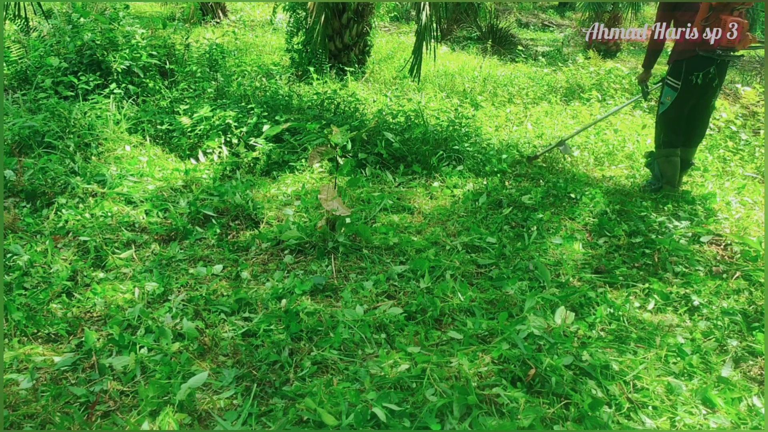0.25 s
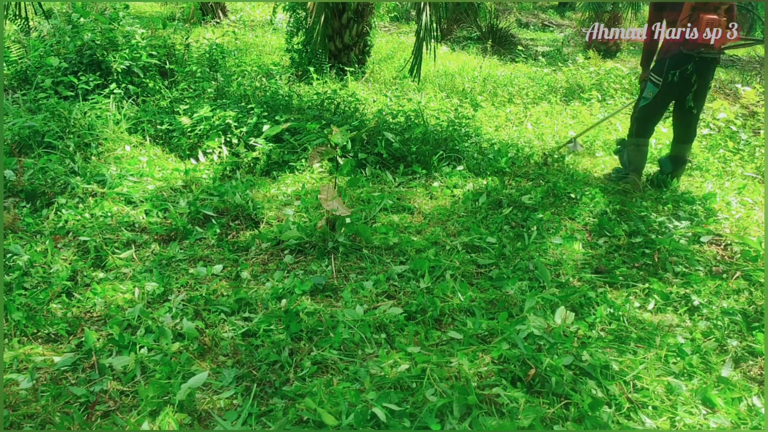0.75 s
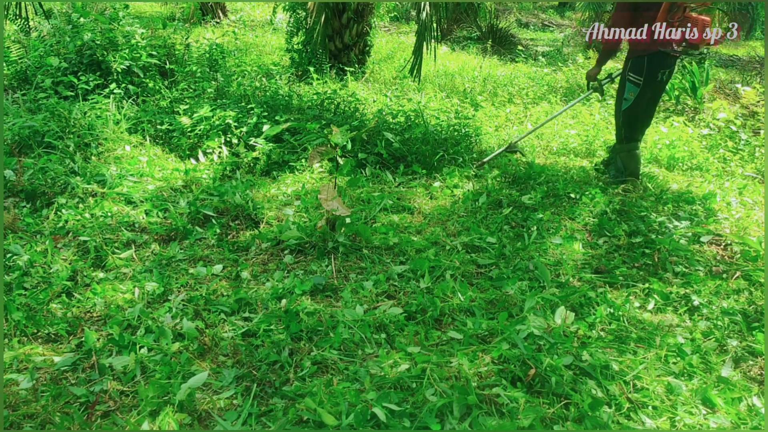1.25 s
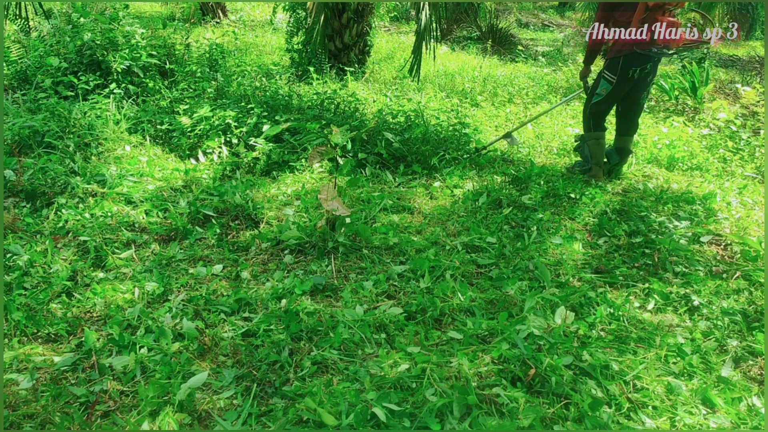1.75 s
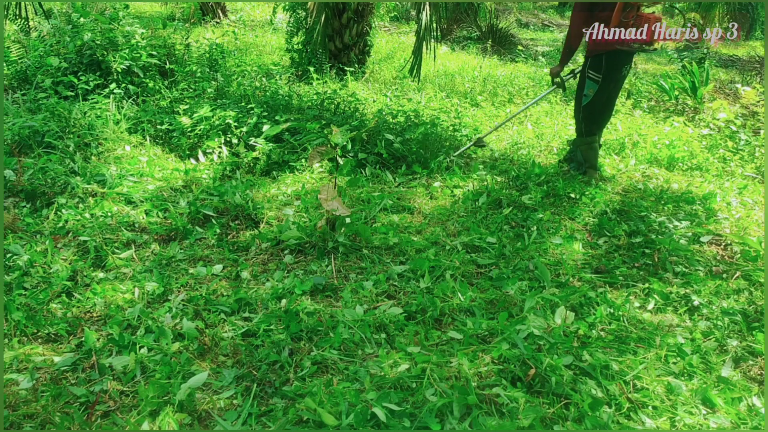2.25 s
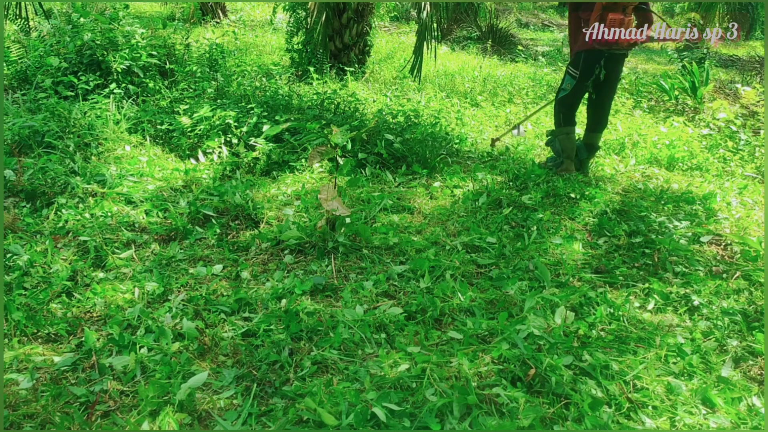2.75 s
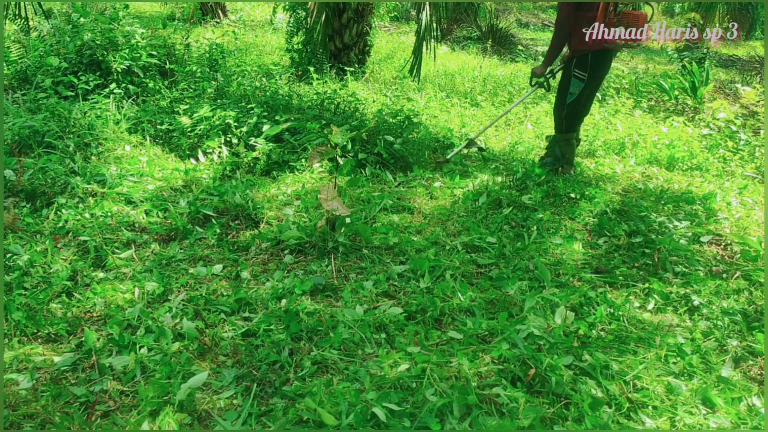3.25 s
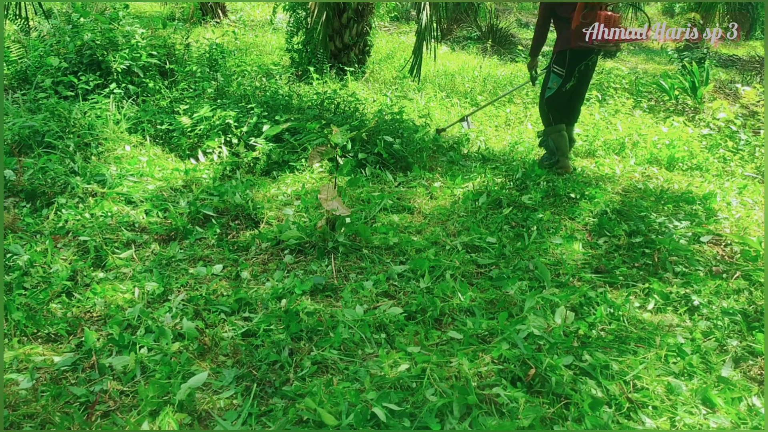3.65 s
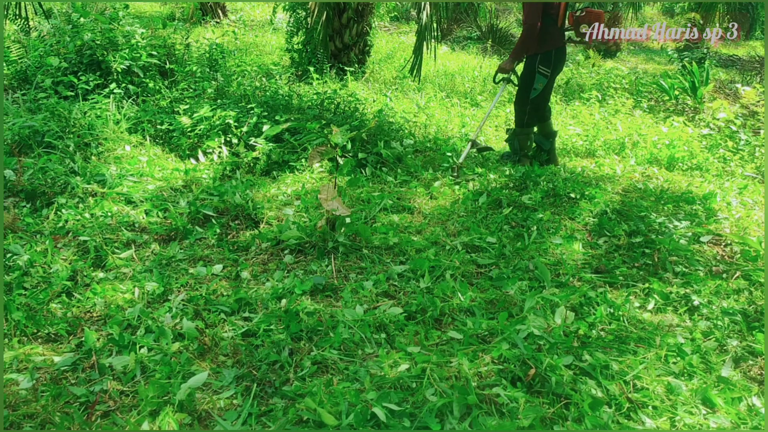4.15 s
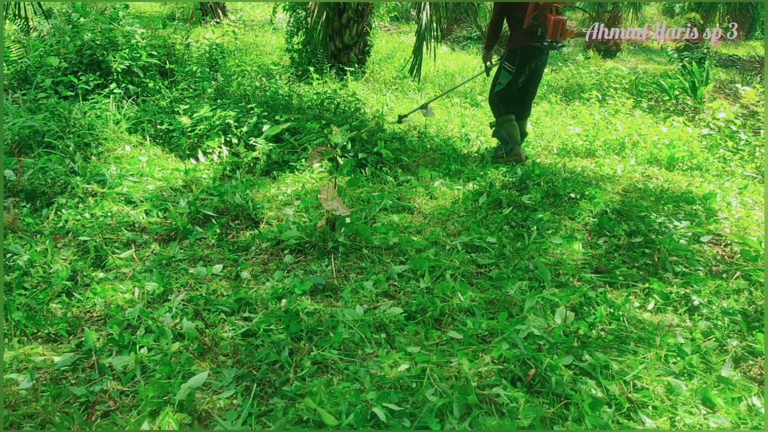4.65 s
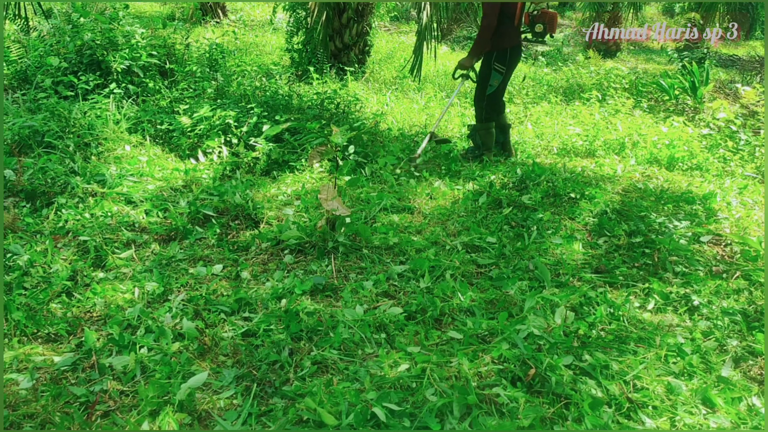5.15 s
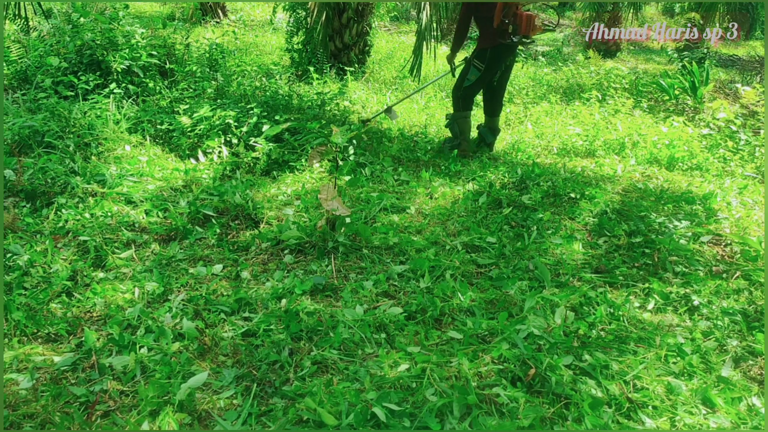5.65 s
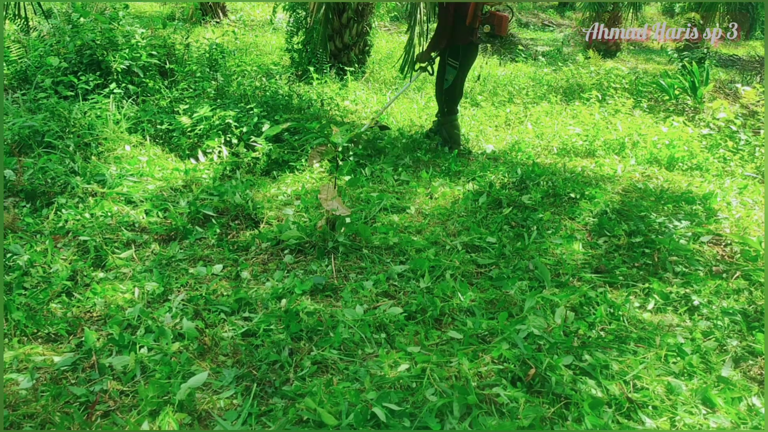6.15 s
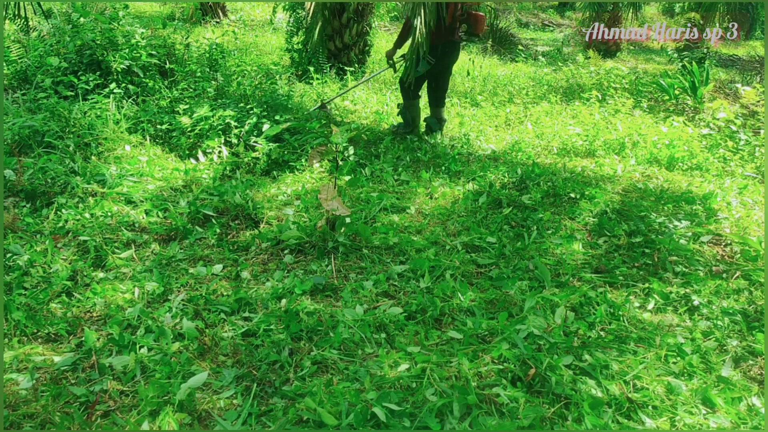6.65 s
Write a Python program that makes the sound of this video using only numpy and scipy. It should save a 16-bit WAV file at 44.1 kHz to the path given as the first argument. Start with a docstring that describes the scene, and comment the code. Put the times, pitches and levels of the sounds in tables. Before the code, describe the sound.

A small petrol brush cutter runs continuously outdoors, a rough, fluttering bark with a hollow boom and metallic casing rattle. Its speed wavers and stumbles under load. About twice a second the blade sweeps into weeds with a bright hissing shred, rustle and occasional sharp snaps. The microphone stands several metres away under trees, in stereo, with faint trunk echoes and very quiet air as the machine slowly moves off.

```python
"""A small petrol brush cutter is swung through weeds under trees, slowly moving away. The two-stroke fires
every other turn: each cycle gives a firing click and a weaker click from the turn without firing; resonances
turn the clicks into boom, bark and puff. Knocks shake noise and rings out of the casing, and the ground and
trees send echoes. The blade shreds stems in bursts of hissing noise with brief stem rings; sharp ticks are
snaps and engine taps. Very quiet low noise stands for the air."""
import sys
import numpy as np
from scipy import signal
from scipy.io import wavfile
from scipy.ndimage import uniform_filter1d

SR = 44100
rng = np.random.default_rng(int(sys.argv[2]) if len(sys.argv) > 2 else 0)


def store_wav(level_fs):
    """Save 16-bit WAV to argv[1]."""
    pcm = np.round(np.clip(np.atleast_2d(level_fs), -1, 1) * 32767)
    wavfile.write(sys.argv[1], SR, pcm.T.astype(np.int16))


N = 303849

# engine speed: (time [s], speed [cycles per s])
ENGINE_SPEED = [(0.0, 44.19), (0.09, 47.78), (0.24, 46.84), (0.57, 40.52), (0.68, 48.1), (0.94, 46.14),
                (1.03, 41.91), (1.16, 43.2), (1.33, 49.94), (1.42, 40.5), (1.51, 46.17), (1.75, 51.78),
                (1.88, 47.2), (1.99, 40.71), (2.21, 49.88), (2.3, 38.45), (2.41, 42.08), (2.54, 39.96),
                (2.73, 51.66), (2.84, 50.05), (2.93, 53.55), (3.02, 51.0), (3.15, 40.82), (3.28, 47.1),
                (3.56, 48.2), (3.72, 55.03), (3.96, 44.09), (4.12, 42.6), (4.27, 45.6), (4.38, 42.8),
                (4.46, 43.33), (4.57, 48.82), (4.72, 54.24), (4.8, 51.06), (5.01, 47.06), (5.14, 51.51),
                (5.47, 45.59), (5.56, 48.28), (5.82, 46.43), (5.91, 41.31), (6.16, 42.56), (6.25, 48.12),
                (6.45, 45.19), (6.54, 50.42), (6.65, 52.02), (6.89, 48.1)]
# exhaust strength: (time [s], boom level [dB], bark level [dB])
EXHAUST_LEVELS = [(0.0, -39.5, -43), (0.11, -45, -40), (0.21, -40.5, -40.5), (0.48, -45, -47),
                  (0.77, -38, -39), (1.19, -48, -48), (1.23, -42, -43.5), (1.46, -41, -47),
                  (1.63, -39, -40), (1.92, -41.5, -46.5), (2.03, -51, -49), (2.15, -39.5, -40),
                  (2.32, -47, -49), (2.59, -42, -45.5), (2.76, -38, -41.5), (3.22, -53.5, -47),
                  (3.34, -43, -41), (3.68, -40.5, -43.5), (4.01, -56.5, -48.5), (4.18, -70.5, -46.5),
                  (4.32, -43, -49.5), (4.55, -41, -42.5), (5.05, -48, -43.5), (5.2, -70.5, -47),
                  (5.33, -43.5, -41.5), (5.39, -60, -47), (5.45, -43.5, -44), (5.78, -44.5, -41),
                  (6.06, -69, -48), (6.1, -53.5, -44), (6.37, -44, -45.5), (6.64, -48.5, -39.5),
                  (6.68, -67, -45.5), (6.77, -44, -40), (6.85, -64, -40.5), (6.89, -38.5, -42)]
# walking away: (time [s], ground echo delay [ms], left lag [samples], casing level [dB], fins level [dB])
WALKING_AWAY = [(0, 1.3, -5.5, -51.5, -52.5), (1, 1.31, -6, -48, -48.5), (1.7, 1.27, -5.5, -50, -52.5),
                (2.5, 1.26, -4, -47.5, -48.5), (3.4, 1.19, -3.5, -49.5, -51.5),
                (4.2, 1.233, -2.5, -49.5, -49), (4.6, 1.13, 3, -49.5, -55.5), (5.2, 1.145, 2, -50, -53.5),
                (6.15, 1.075, 3, -50, -55.5), (6.89, 0.91, 1.5, -51.5, -59)]


def amp(db):
    """Turn dB into a gain."""
    return 10 ** (np.asarray(db) / 20)


def rms_one(x, size=0):
    """Bring the level to 1, overall or along a moving window smoothed twice over `size` samples."""
    if size:
        power = uniform_filter1d(uniform_filter1d(x ** 2, size), size)
    else:
        power = np.mean(x ** 2)
    return x / np.sqrt(power + 1e-20)


def in_time(rows):
    """Draw straight lines between a table's rows: each column gets one value a sample."""
    s, *columns = np.transpose(rows)
    return [np.interp(np.arange(N) / SR, s, c) for c in columns]


def resonate(x, modes):
    """Let resonances ring side by side, with alternating signs; a narrow width rings longer."""
    out = 0
    for k, (hz, width_hz, db) in enumerate(modes):
        r = np.exp(-np.pi * width_hz / SR)
        a = [1, -2 * r * np.cos(2 * np.pi * hz / SR), r * r]
        b = [(1 - r * r) / 2, 0, (r * r - 1) / 2]
        out = out + (-1) ** k * amp(db) * signal.lfilter(b, a, x + 1e-18)
    return out


def butter(x, order, hz, kind="low"):
    """Filter away what lies above (low), below (high) or outside (band) the given frequencies."""
    return signal.sosfilt(signal.butter(order, hz, kind, fs=SR, output="sos"), x)


def band(x, low_hz, high_hz):
    """Keep the sound between two frequencies, with gentle edges."""
    return butter(x, 2, [low_hz, high_hz], "band")


def delayed(x, samples):
    """Read a sound later by a lag that may move; a negative lag reads it earlier."""
    return np.interp(np.arange(N) - samples, np.arange(N), x)


def flicker(hz):
    """Random wandering no faster than about `hz`, of spread 1, unrelated left and right."""
    return rms_one(butter(rng.standard_normal((2, N)), 2, hz))


def cycles(size):
    """Count engine cycles up to each sample; each stumble is spread over `size` samples."""
    # uneven beats: (last firing before it [s], size: above 0 holds the beat back, below 0 hurries it)
    stumbles = [(0.355, 1), (0.411, 1), (0.467, -1), (0.552, -1), (0.803, .42), (0.938, .48), (1.008, 1.37),
                (1.165, 1.4), (1.328, 1), (1.495, 1), (2.078, 1), (2.257, -1), (2.319, -1), (2.552, -1),
                (3.254, 1), (3.306, 1), (3.964, 1), (4.016, 1), (4.759, .6), (5.048, .45), (5.073, .2),
                (5.273, 1.3), (5.418, 1), (5.968, 1), (6.049, 1), (6.151, 1), (6.726, 1)]
    late_cycles, early_cycles = .43, .45  # shift of the beat for a stumble of size 1
    late_after_s, early_after_s = .014, .003  # when the shift sets in
    inertia_s, first_cycle = .05, .28
    lost = np.zeros(N)
    for s, way in stumbles:
        after_s, shift = (late_after_s, late_cycles) if way > 0 else (early_after_s, early_cycles)
        lost[round((s + after_s) * SR):] += way * shift
    # the flywheel rounds off every change of speed
    span = round(inertia_s * SR)
    speed = uniform_filter1d(in_time(ENGINE_SPEED)[0], span, mode="nearest")
    speed = uniform_filter1d(speed, span, mode="nearest")
    return np.cumsum(speed) / SR - first_cycle - uniform_filter1d(lost, size)


def pulses(count, spread_db, jitter_ms, lead_ms):
    """One click as the count passes each whole cycle, a little scattered in strength and moment."""
    step = np.diff(count)
    at = np.flatnonzero((np.diff(np.floor(count)) > 0) & (step < .1))  # a jump forward does not click
    draw = rng.standard_normal((400, 2))[:len(at)]
    moved = at + (draw[:, 0] * jitter_ms - lead_ms) * SR / 1000
    clicks = np.zeros(N)
    clicks[np.clip(moved.astype(int), 0, N - 1)] = amp(draw[:, 1] * spread_db)
    return clicks


def gas_noise(exhaust, unfired):
    """Turbulent gas hisses after each valve opening and dies within a few tens of ms."""
    gust = signal.lfilter([1], [1, -np.exp(-1 / (.007 * SR))], exhaust + .8 * unfired)
    return gust * rng.standard_normal(N)


def boom_and_growl(exhaust, gas):
    """Exhaust pulses and a little gas noise ring low resonances: a boom, and a growl just above it."""
    # boom resonances: (frequency [Hz], width [Hz], level [dB])
    boom_modes = [(226, 66.8, 7.5), (293, 181, 2)]
    # growl resonance: (frequency [Hz], width [Hz], level [dB])
    growl_modes = [(342.3, 198, 0)]
    # growl, stronger when the pipe points this way: (time [s], level [dB])
    growl_db = [(0, -38.5), (.25, -42.5), (.36, -38), (.9, -45), (1.1, -39), (1.8, -43), (1.9, -40.5),
                (2.1, -43.5), (3.8, -44), (4.1, -55.5), (4.5, -41), (5.2, -67), (5.5, -44), (6.15, -61),
                (6.33, -37), (6.5, -42), (6.68, -54), (6.8, -44.5), (6.89, -54)]
    boom_lead_ms = 2.69  # the slow boom starts before the crack
    early = delayed(exhaust, -boom_lead_ms * SR / 1000)
    boom = resonate(resonate(early + .008 * gas, boom_modes), [(270, 300, 0)])
    growl = resonate(resonate(exhaust + 0.02 * gas, growl_modes), growl_modes)
    boom = amp(in_time(EXHAUST_LEVELS)[0]) * rms_one(boom, size=3000)
    return boom + amp(in_time(growl_db)[0]) * rms_one(growl)


def bark_and_puff(exhaust, unfired, gas):
    """The pipe rings and cracks at each firing, and the turn without firing puffs; their top edge comes apart."""
    # pipe ring, lower and upper mode: (frequency [Hz], width [Hz], level [dB])
    ring_modes = [(525, 98, 9), (701, 95, -1.5)]
    # crack resonances: (frequency [Hz], width [Hz], level [dB])
    crack_modes = [(685, 380, 0), (1045, 280, -1.5)]
    # resonances of the unfired turn's puff: (frequency [Hz], width [Hz], level [dB])
    puff_modes = [(857, 690, 0), (1026, 150, -9.5)]
    # puff of the unfired turn: (time [s], level [dB])
    puff_db = [(0.0, -54), (0.53, -44), (1.17, -49), (1.54, -45.5), (1.92, -48.5), (1.96, -53.5),
               (2.22, -46), (2.3, -51), (2.4, -47.5), (2.8, -43.5), (3.2, -50.5), (3.57, -48.5),
               (3.67, -42), (3.78, -51), (3.82, -44.5), (3.89, -51), (3.95, -46), (4.11, -51), (4.49, -46),
               (5.22, -48.5), (5.66, -48.5), (5.76, -45), (6.04, -50.5), (6.47, -48), (6.81, -49.5),
               (6.89, -49)]
    # top edge of the bark and puff mids: (time [s], level [dB])
    edge_db = [(0.0, -93), (0.15, -75), (0.31, -75), (0.34, -72), (0.96, -75), (1.0, -67), (1.25, -89.5),
               (1.34, -69), (1.44, -87), (1.92, -65), (2.09, -90), (2.24, -72), (2.28, -82), (2.76, -62.5),
               (2.88, -71), (3.07, -60), (3.18, -81.5), (3.61, -80), (3.65, -69), (3.93, -74), (3.97, -68),
               (4.18, -93), (4.22, -83), (4.45, -66), (4.51, -84), (4.57, -67), (4.89, -65), (5.14, -88),
               (5.31, -71), (5.74, -66), (6.12, -87), (6.33, -69), (6.83, -67), (6.89, -68)]
    ring_lead_ms = 1.51  # the ring starts before the crack
    brightens_db = 1.68  # upper ring mode, for each cycle a second above 45.5
    crack_db = -11  # crack against ring when boom and bark levels are equal
    return_ms, return_gain = 1.15, .5  # the crack comes back once from the pipe's end
    boom_db, bark_db = in_time(EXHAUST_LEVELS)
    # extra gas noise in the pipe when the boom dies away
    unburnt = .026 * np.clip((bark_db - boom_db) / 10, 0, 1)

    # the pipe rings when the valve opens
    opening = delayed(exhaust, -ring_lead_ms * SR / 1000) + (.01 + unburnt) * gas
    brightens = amp(brightens_db * (in_time(ENGINE_SPEED)[0] - 45.5))
    ring = rms_one(resonate(opening, ring_modes[:1]) - brightens * resonate(opening, ring_modes[1:]))
    # a charge that burnt adds a crack that grows with the boom
    blast = exhaust + return_gain * delayed(exhaust, return_ms * SR / 1000)
    crack_gain = amp(np.clip(boom_db - bark_db + crack_db, -30, 8))
    crack = crack_gain * rms_one(resonate(blast, crack_modes))
    bark = amp(bark_db) * rms_one(ring + crack, size=3000)

    puff = rms_one(resonate(unfired + (.018 + unburnt) * gas, puff_modes), size=3000)
    mids = band(bark + amp(in_time(puff_db)[0]) * puff, 362, 1017)
    edge = rms_one(butter(mids, 4, [1095, 1320], "band"), size=3000)
    return butter(mids, 16, 1145), amp(in_time(edge_db)[0]) * edge


def casing_rattle(count, unfired):
    """Each cycle knocks casing and cooling fins; the knocks and fading noise make their metal ring."""
    # casing resonances: (frequency [Hz], width [Hz], level [dB])
    casing_modes = [(1560, 320, -6.5), (1817, 25, 3), (2050, 180, -3), (2204, 58, -8.5), (2467, 48, -7),
                    (3000, 270, -10)]
    # cooling fin resonances: (frequency [Hz], width [Hz], level [dB])
    fin_modes = [(3280, 11, -13), (3420, 400, -16), (4800, 720, -12), (6280, 110, -11), (6600, 33, -18)]
    follows = 0.63  # share of the bark's swing in dB that shakes the casing
    knocks = pulses(count, 2.5, 0.11, 2.3) + 0.57 * unfired  # some cycles knock harder
    shaking = signal.lfilter([1], [1, -np.exp(-1 / (.006 * SR))], knocks)
    shake = (0.095 + shaking) * rng.standard_normal(N) + 5.2 * knocks
    casing_db, fins_db = in_time(WALKING_AWAY)[2:]
    rattle = amp(casing_db) * rms_one(resonate(shake, casing_modes))
    rattle = rattle + amp(fins_db) * rms_one(resonate(shake, fin_modes))
    bark_db = in_time(EXHAUST_LEVELS)[1]
    return butter(rattle, 12, 1480, "high") * amp(follows * (bark_db + 30.5))


def low_orders():
    """Deep hum at whole multiples of the cycle rate; it flickers and thins out with distance."""
    # hum tones, before the hum's own changes: (multiple of the cycle rate, level [dB])
    hum_tones = [(1, -75.5), (2, -66), (3, -60.5)]
    fade_db_per_s = 0.87
    turning = cycles(size=8000)  # the flywheel evens out the stumbles
    bark_db = in_time(EXHAUST_LEVELS)[1]
    hum = sum(amp(db + .5 * (bark_db + 49.0)) * np.cos(2 * np.pi * k * turning) for k, db in hum_tones)
    return hum * amp(1.9 * flicker(15)[0] + 3.0 - fade_db_per_s * np.arange(N) / SR)


def engine():
    """One cycle count drives firing pulses, unfired-turn pulses and casing; returns what the ground echoes, and
    the rest."""
    unfired_after = .57  # share of a cycle from a firing to the unfired turn's pulse
    count = cycles(size=1)
    exhaust = pulses(count, 1.2, .07, 2.3)
    unfired = pulses(count - unfired_after, 1.4, .1, 2.5)
    gas = gas_noise(exhaust, unfired)
    mids, edge = bark_and_puff(exhaust, unfired, gas)
    echoed = boom_and_growl(exhaust, gas) + mids + casing_rattle(count, unfired)
    return echoed, low_orders() + edge


def swell(start, end, start_db, end_db, rise, fall):
    """Power that rises to `start`, slopes to `end` and falls away; rise and fall in dB per s."""
    t = np.arange(0, N, 40) / SR  # every 40th sample is enough
    db = np.interp(t, [start, end + 1e-4], [start_db, end_db])
    db = db - rise * np.maximum(start - t, 0) - fall * np.maximum(t - end, 0)
    return amp(2 * db)


def shredding_db():
    """The powers of sweeps and thicker clumps add up to the level of the cut."""
    # blade sweeps through the weeds: (bite [s], leaving [s], level at the bite [dB], level on leaving [dB])
    sweeps = [(0.099, 0.522, -45.5, -48), (0.566, 1.054, -52, -44), (1.194, 1.58, -51, -48.5),
              (1.736, 2.016, -47, -44.5), (2.198, 2.432, -43.5, -59.5), (2.698, 3.112, -53, -41),
              (3.15, 3.506, -49.5, -56), (3.709, 4.113, -47.5, -47.5), (4.19, 4.435, -52.5, -44.5),
              (4.707, 5.027, -46, -52), (5.262, 5.51, -43.5, -52), (5.54, 6.02, -49.5, -47),
              (6.288, 6.475, -45, -48), (6.672, 6.86, -49.5, -45)]
    # thicker clumps met on the way: (time [s], level [dB])
    clumps = [(.23, -73), (.42, -42.5), (.82, -45), (1.021, -43.5), (1.35, -45), (1.744, -38.5),
              (1.9, -39.5), (2.549, -72), (2.879, -42.5), (3.1, -55), (3.469, -43.5), (3.82, -44),
              (3.949, -42.5), (4.0, -43.5), (4.43, -63), (4.779, -51), (4.852, -42), (4.926, -43.5),
              (5.03, -44), (5.601, -43.5), (5.868, -41.5), (5.97, -46.5), (6.74, -40.5)]
    power = sum(swell(*row, rise=394.5, fall=223.5) for row in sweeps)
    power = power + sum(swell(s, s, db, db, rise=252, fall=159) for s, db in clumps)
    return np.interp(np.arange(N), np.arange(0, N, 40), 10 * np.log10(power + 1e-10))


def stem_pings():
    """Cut stems ring briefly: sparse hits are dealt to 14 resonators of different pitch."""
    pings_per_s, ring_cycles = 300, 73  # width of each resonance is its pitch / ring_cycles
    born = (rng.random((2, N)) < pings_per_s / SR) * rng.standard_normal((2, N))
    dealt = rng.integers(0, 14, (2, N))
    pitches = np.geomspace(1700, 5600, 14)
    rings = [resonate(born * (dealt == k), [(hz, hz / ring_cycles, 0)]) for k, hz in enumerate(pitches)]
    return rms_one(sum(rings))


def sharp_ticks():
    """Stems snapping on the blade, and a few engine taps in the lulls: a click and a dying noise burst."""
    # ticks: (time [s], level before filtering and a 12 dB cut [dB], time to fade by 60 dB [s])
    ticks = [(.45, -42, .05), (0.522, -38, .04), (0.587, -39, 0.067), (1.241, -31, 0.064),
             (1.721, -26.5, 0.33), (1.888, -27, 0.063), (2.105, -40, 0.03), (2.193, -40, 0.071),
             (2.288, -48, .04), (2.316, -39, 0.034), (2.425, -42, 0.034), (2.544, -45, 0.051),
             (2.703, -42, .05), (2.748, -34.5, 0.58), (3.428, -39, 0.065), (3.9087, -27.5, 0.21),
             (3.96, -36.5, .01), (3.965, -19, 0.047), (4.15, -38, 0.028), (4.309, -47, 0.055),
             (4.845, -34, 0.049), (5.17, -42, 0.055), (6.1, -39, 0.096), (6.122, -40.5, 0.15),
             (6.273, -41, 0.18), (6.69, -45, .06), (6.719, -36, 0.052)]
    out = np.zeros((2, N))
    t = np.arange(6000) / SR
    for s, db, t60 in ticks:
        i = round(s * SR)
        fading = amp(-60 * t / max(t60, .005)) + 1.2 * amp(-60 * t / .006)  # a very short, stronger start
        burst = rng.standard_normal((2, 6000)) * fading
        burst[:, 0] = 11  # a click at the very start
        tick = band(burst + 0.32 * burst[::-1], 3100, 14000) * amp(db - 12.0)
        out[:, i:i + 6000] += tick[:, :N - i]
    return out


def blade():
    """Dense uneven stem hits, made of noise: bright shredding and lower rustle, plus the sharp ticks."""
    # the rustle swells and thins against the shredding: (time [s], level [dB])
    rustle_swing_db = [(0, -3.5), (.35, -1), (.5, -2.5), (.85, -3.5), (1.0, -1.5), (1.15, 4), (1.5, -1.5),
                       (1.85, -1), (2.1, 0.5), (2.3, 3), (2.7, -1), (3.05, -2), (3.45, -0.5), (3.7, 0),
                       (3.95, 0.5), (4.2, -7), (4.45, 3.5), (4.7, 1), (4.9, 3), (5.1, -4), (5.35, 3),
                       (5.7, 0.5), (5.85, 2), (6.0, 0.5), (6.3, 2.5), (6.6, 2.5), (6.89, -1.5)]
    rustle_db, rustle_follows = -52.5, 1  # level at -43.5 dB of shredding; share of its swing
    soften_s = 0.03  # the rustle rises and falls more softly than the shredding
    # the weeds stand very slightly thicker and thinner; the cut flutters faster
    shred_db = shredding_db() - 0.02 * flicker(5.1)[0] + 1 * flicker(13.7)[0]
    sizes = amp(2.1 * np.minimum(rng.exponential(1, (2, N)), 5)) * rng.standard_normal((2, N))
    hits = sizes * amp(2.0 * flicker(56) + 1.0 * flicker(170))
    # each ear also gets a little of the other side
    shred = rms_one(band(hits + 0.13 * hits[::-1], 4980, 12330))
    rustle = rms_one(band(band(hits + 0.23 * hits[::-1], 1300, 5960), 920, 9000)) + stem_pings()
    rustle = butter(rustle, 4, 1400, "high") * amp(in_time(rustle_swing_db)[0])
    softened_db = uniform_filter1d(np.maximum(shred_db, -75), round(soften_s * SR))
    rustle = amp(rustle_db + rustle_follows * (softened_db + 43.5)) * rustle
    return amp(shred_db) * shred + rustle + sharp_ticks()


def ground_bounce(direct):
    """The ground sends a duller copy; with the direct sound its notches rise as the path gets flatter."""
    grass_hz = 4700  # the treble above this is dulled
    echo_ms = in_time(WALKING_AWAY)[0]
    late = delayed(direct, echo_ms * SR / 1000 - 2)
    return signal.lfilter(*signal.butter(1, grass_hz, fs=SR), late)


def trees(x):
    """Scattered echoes off trunks, fading with delay, other ones in each ear."""
    out = np.zeros((2, N))
    for k, s in enumerate(rng.uniform(.004, .09, 40)):
        lag = round(s * SR)
        out[k % 2, lag:] += rng.normal() * amp(-60 * s / .3) * x[:-lag]
    return out


def quiet_air():
    """Quiet low noise, mostly the same in both ears."""
    noise = rng.standard_normal(N) + 0.28 * rng.standard_normal((2, N))
    return amp(-71) * rms_one(band(noise, 45, 230))


def scene():
    """Engine with ground echo and trees, blade, quiet air; a moving lag in the left ear shifts the engine."""
    echo_share, trees_db = 0.74, -15
    left_lag = in_time(WALKING_AWAY)[1]
    direct, unechoed = engine()
    near = 0.79 * (direct + echo_share * ground_bounce(direct)) + unechoed
    ears = np.array([amp(1.5) * delayed(near, 8 + left_lag), amp(0.5) * delayed(near, 8)])
    return ears + amp(trees_db) * trees(band(near, 300, 9000)) + blade() + quiet_air()


def record(dry):
    """Each microphone port adds its own treble resonance and rolls off above it; the top is cut."""
    # left and right port: (frequency [Hz], width [Hz], level [dB], roll-off [Hz])
    mic_ports = [(6823, 540, 15.5, 7920), (7310, 690, 1.5, 8970)]
    cutoff_hz = 8330  # from here up at least 50 dB down in each of the two cuts
    out = [butter(x + resonate(x, [port]), 4, top_hz) for x, (*port, top_hz) in zip(dry, mic_ports)]
    for order in (14, 24):
        out = signal.sosfilt(signal.cheby2(order, 50, cutoff_hz, fs=SR, output="sos"), out)
    return out


dry = scene()
out = record(dry)
store_wav(out)
```